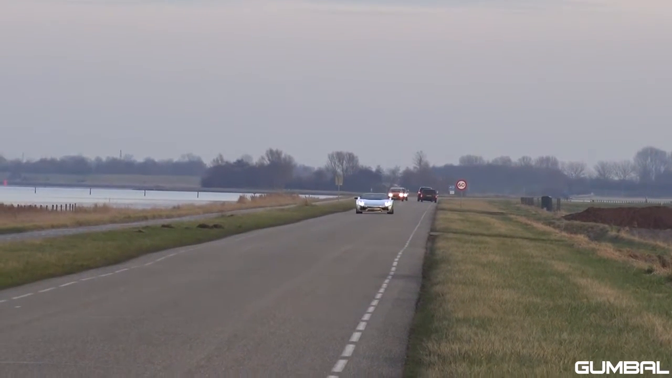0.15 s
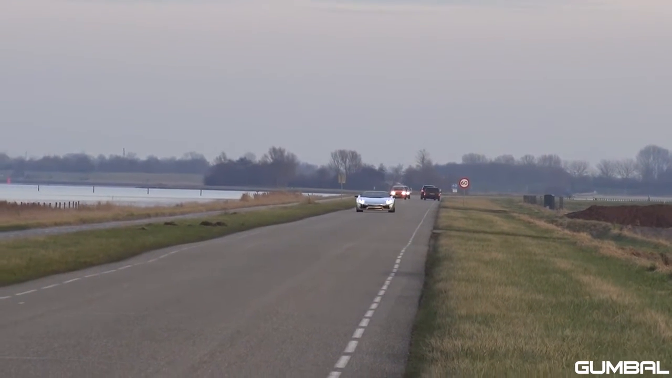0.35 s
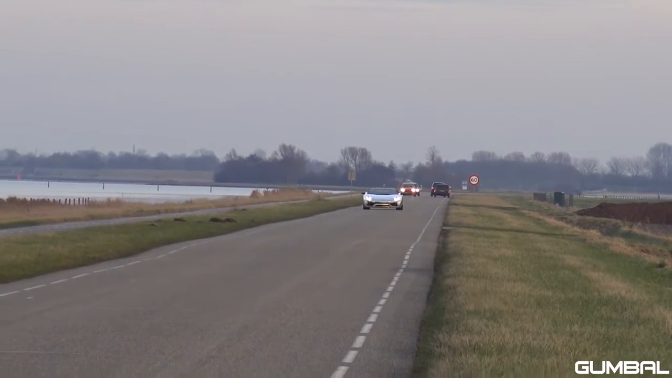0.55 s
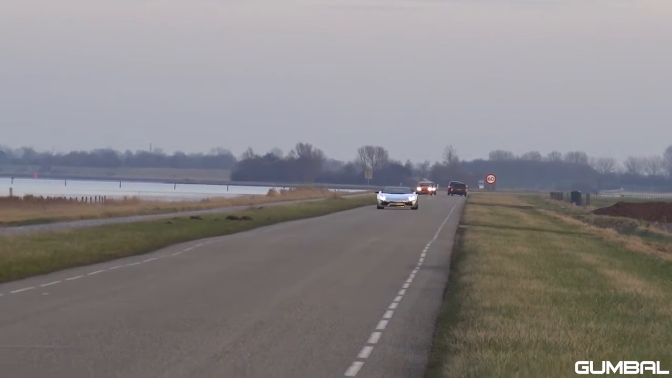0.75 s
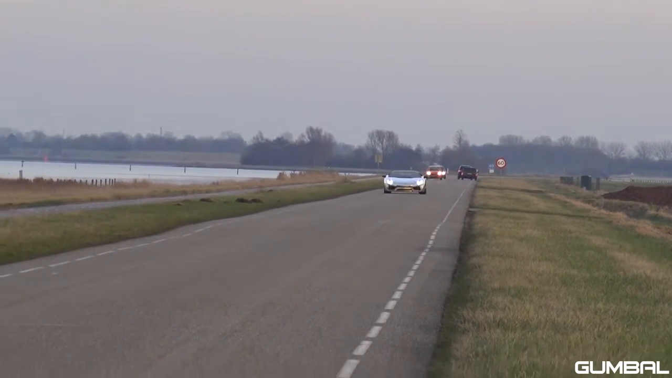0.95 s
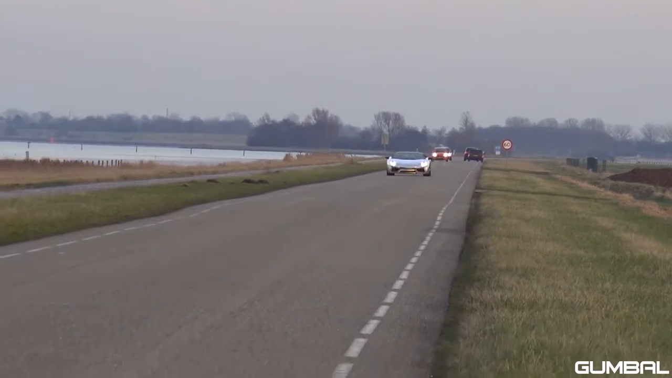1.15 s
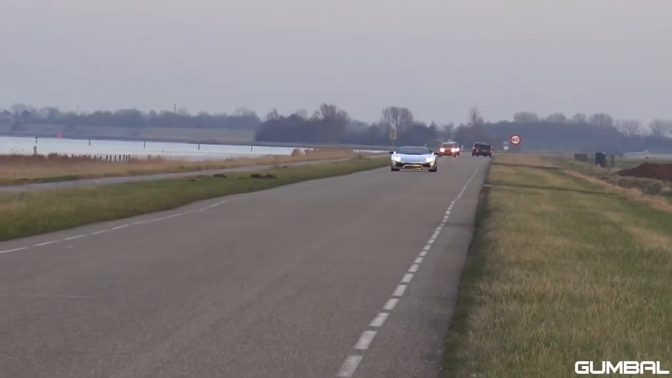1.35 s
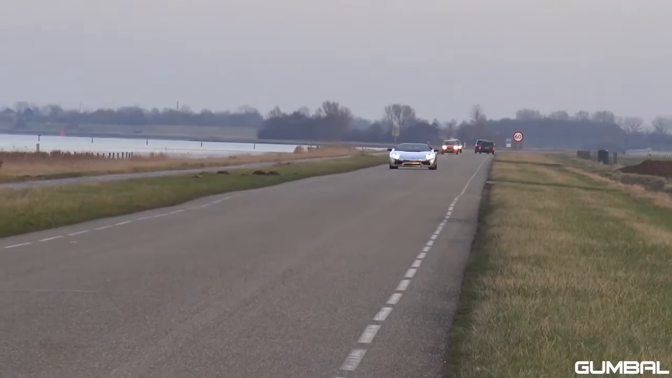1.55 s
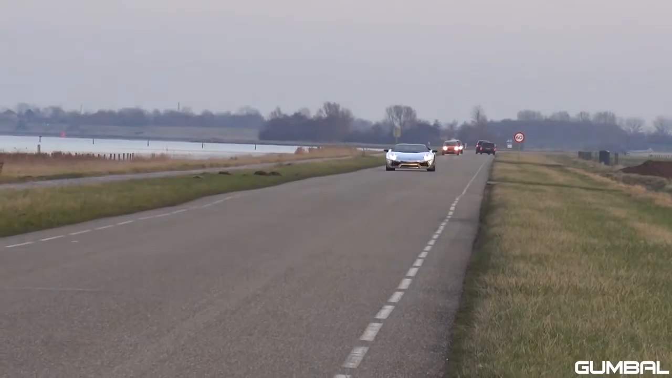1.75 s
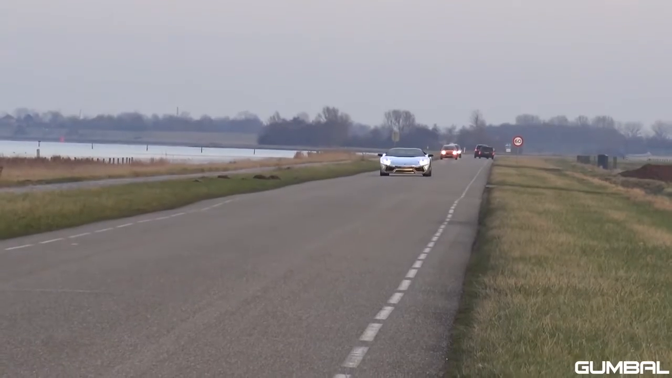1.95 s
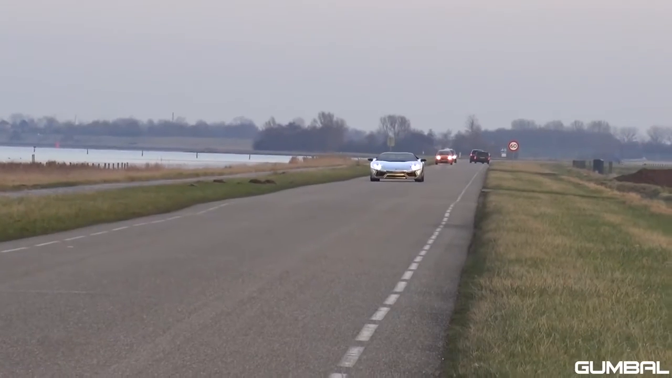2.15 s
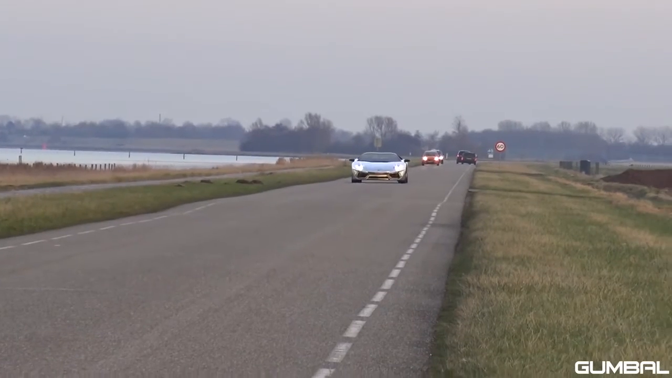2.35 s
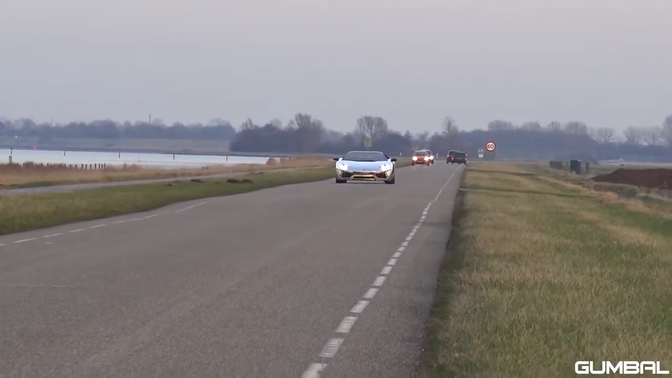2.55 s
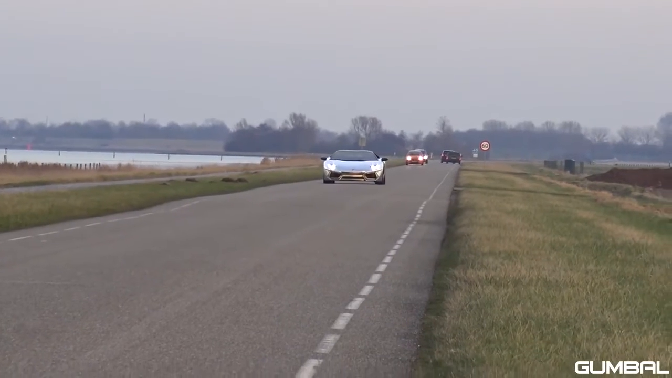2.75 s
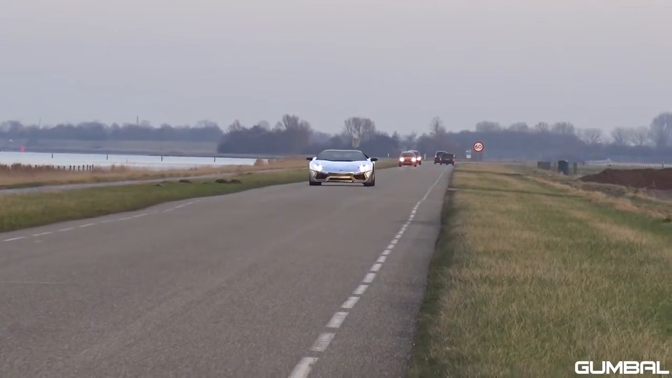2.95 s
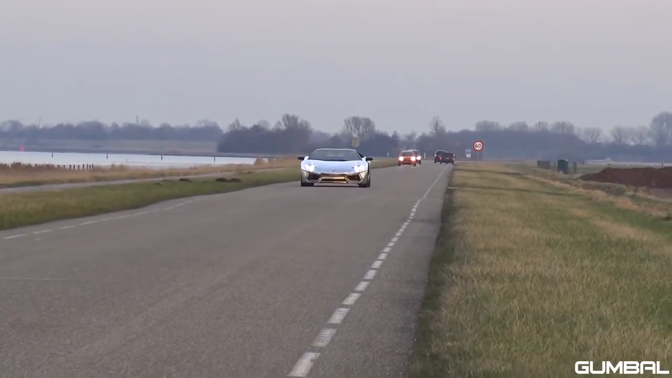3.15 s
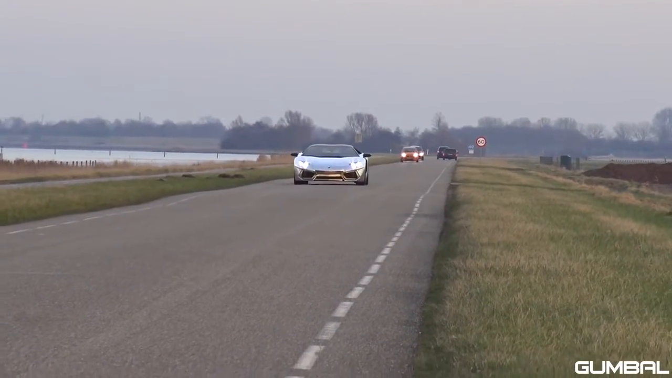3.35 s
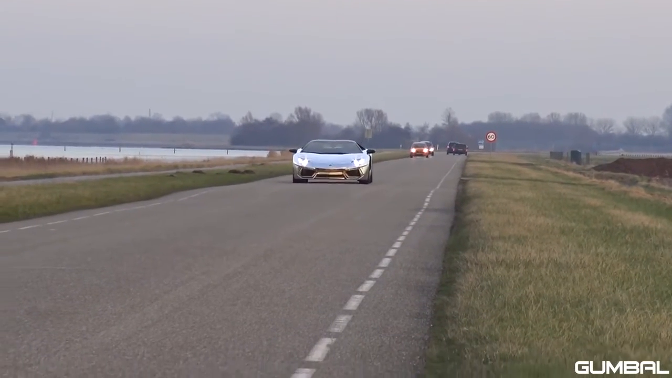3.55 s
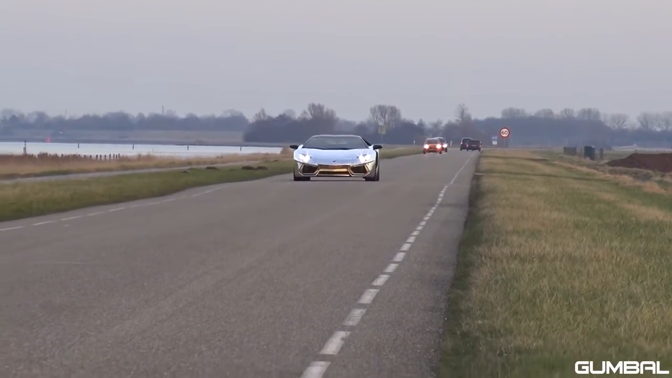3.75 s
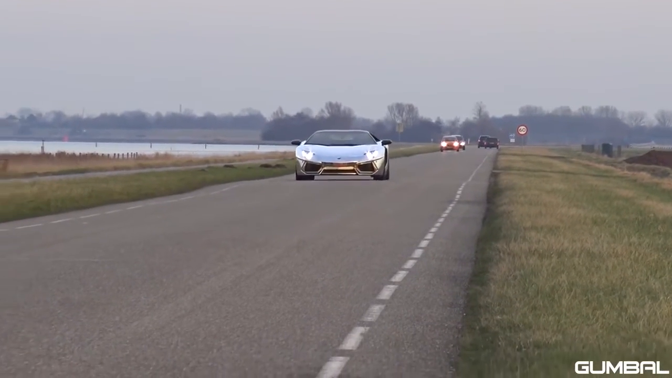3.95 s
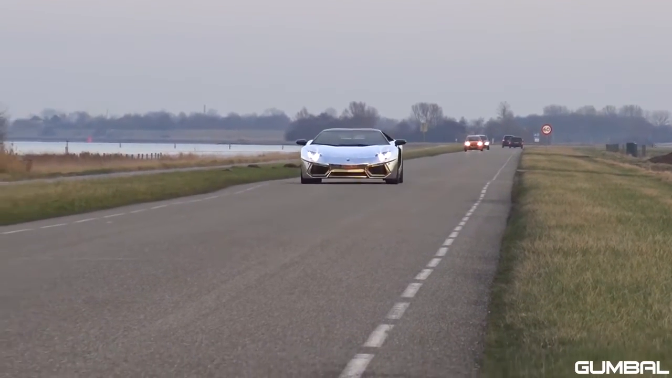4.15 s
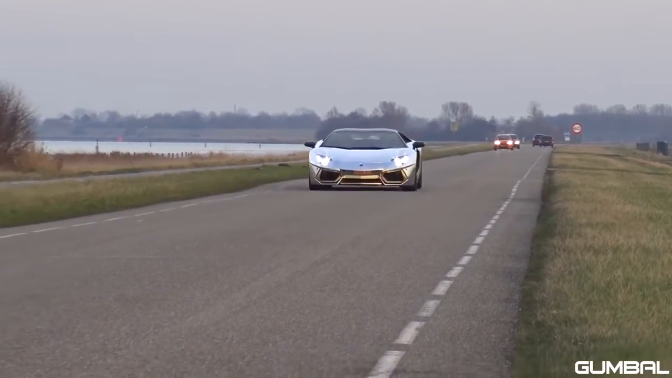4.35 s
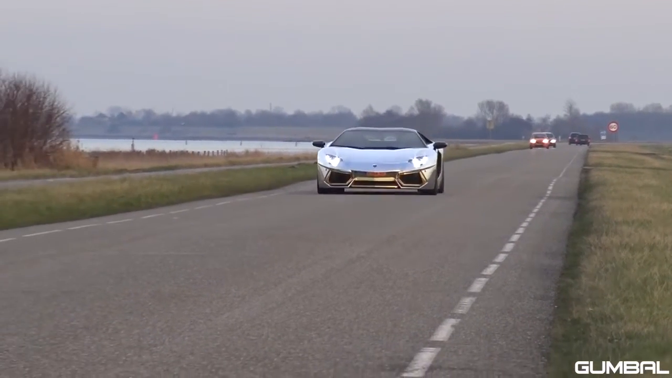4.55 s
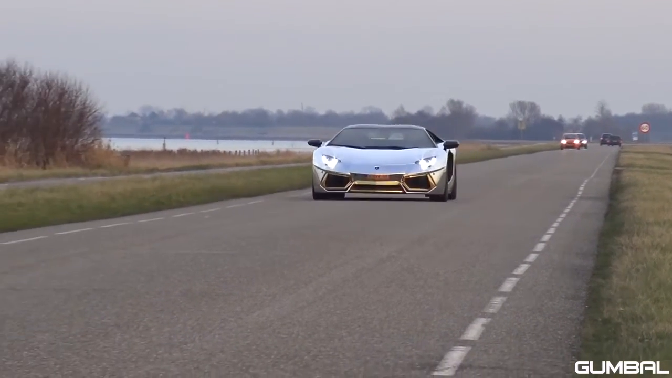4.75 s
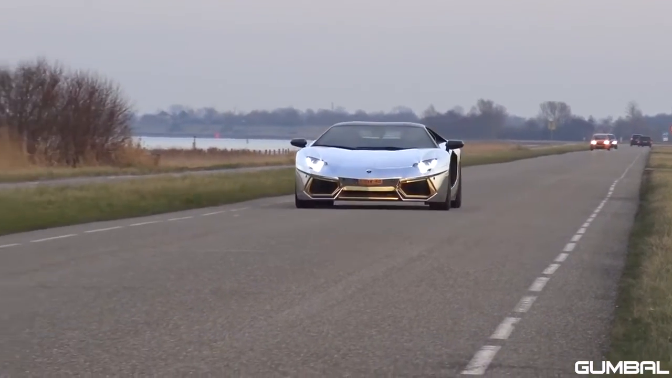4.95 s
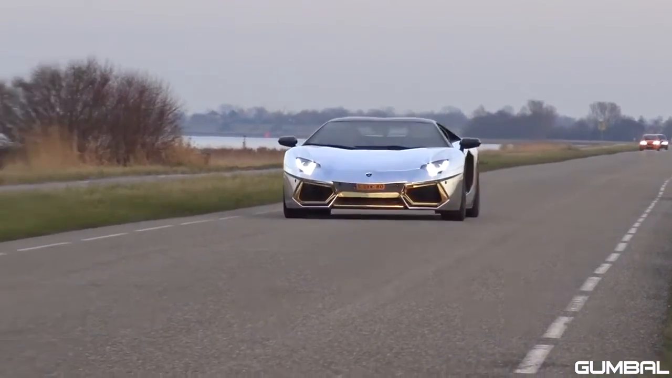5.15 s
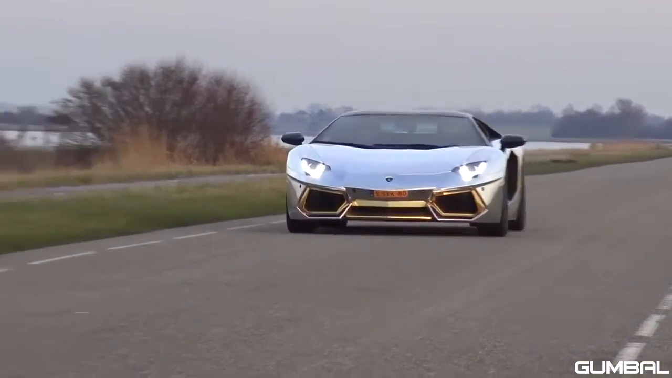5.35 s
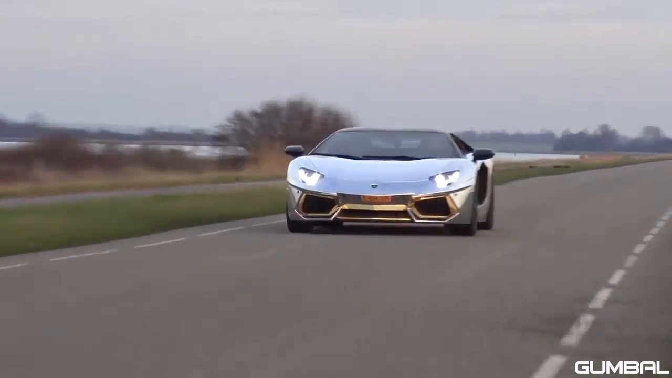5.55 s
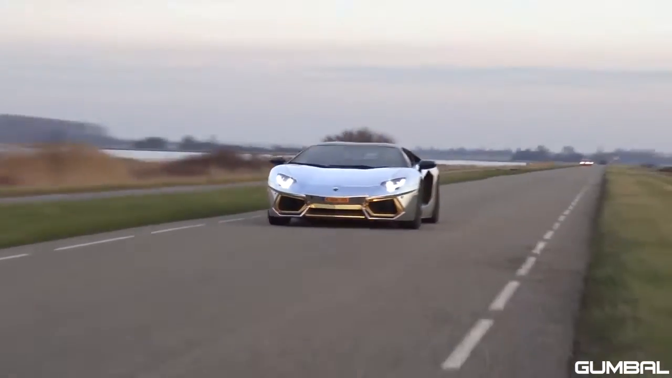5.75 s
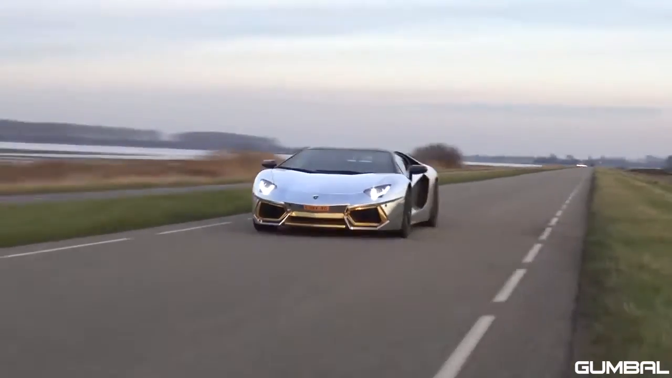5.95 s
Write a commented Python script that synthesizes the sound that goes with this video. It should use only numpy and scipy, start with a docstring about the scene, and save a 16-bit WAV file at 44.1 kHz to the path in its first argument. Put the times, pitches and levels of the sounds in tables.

```python
"""A high engine wail is heard first, harsh for an instant, climbing as a twelve-cylinder sports car nears flat out.
Sines at orders of the four-stroke cycle make the wail; banded noise makes the roar of exhaust flow and tyres,
which brightens as the path shortens. In the one upshift cylinders are cut and low orders and misfires burble;
then a lower note shudders and climbs again until the car draws level. Low noise and short puffs of wind buffet
the microphone over a quiet background of countryside and hiss."""
import sys
import numpy as np
from scipy import signal
from scipy.fft import rfft, irfft, next_fast_len
from scipy.io import wavfile

SR = 44100
rng = np.random.default_rng(int(sys.argv[2]) if len(sys.argv) > 2 else 0)


def pcm_store(signal):
    """Save signal as 16-bit PCM."""
    levels = np.round(np.clip(np.atleast_2d(signal), -1, 1) * 32767)
    wavfile.write(sys.argv[1], SR, levels.astype(np.int16).T)


N = 268569
TIME = np.arange(N) / SR
CYLINDERS = 12  # also the order of the firing note, as each cylinder fires once per cycle

# strong engine orders, 12 being the firing note and 6 one cylinder bank: [order in multiples of the
# four-stroke cycle, relative level/dB, loss off the throttle/dB, gain with distance/dB per 100 m]
STRONG_ORDERS = [(6, -25.5, 2, -2.5), (9, -25.5, 5.5, -0.33), (12, -13.5, 19, 0.5), (15, -21.5, 17, -0.25),
                 (21, -23.5, 13.5, -1.5), (24, -25.5, 7, 1.5)]
# exhaust resonances through which the orders sweep: [f/Hz, relative level/dB]
EXHAUST_RESPONSE = [(340, -19.5), (385, -18), (412, -3), (428, -12.5), (455, 4.5), (478, 5), (520, 2),
                    (600, 1), (625, -0.5), (655, -10), (700, -0.5), (800, 2.5), (950, -2.5), (1025, -7.5),
                    (1090, -17), (1280, -5), (1400, 1.5), (1450, 0), (1510, -4), (1610, -0.5), (1710, -7),
                    (1780, -1.5), (1900, -6.5)]
# slow swell of the firing note: [t/s, relative level/dB]
FIRING_SWELL = [(0, 0.5), (.2, -0.5), (.38, 1), (.55, -2), (.8, 1.5), (1, -1), (1.2, 1.5), (1.6, -2),
                (2.1, -0.6), (2.6, 3.5), (3.25, 1.5), (3.62, 4.5), (4.35, 1.5), (4.55, 3), (5.15, 3.5),
                (5.38, 0), (5.68, 1), (6.09, -3)]
TONES_LEVEL_OFF_M = 24.4  # well inside this the body hides the tailpipes and the tones hardly grow
HARSH_UNTIL_S, HARSH_FADE_S, HARSH_DB = 0.079, 0.046, 5  # orders above the firing note start higher
SHUDDER_DB = 3  # the note is loudest when dragged lowest


def engine_note(cycles, cycle_hz, lifted, waver_db=1.5, note_waver_db=0.38):
    """Harmonic synthesis through a source filter: strong orders, coloured by the exhaust, waver in moving air."""
    out = np.zeros(N)
    hundreds = distance() / 100
    harsh_start = 1 - ramp(HARSH_UNTIL_S, HARSH_FADE_S)
    for order, db, lost_db, carry_db in STRONG_ORDERS:
        throttle_gain = 1 - lifted * (1 - from_db(-lost_db))
        level = db + carry_db * hundreds + 20 * np.log10(throttle_gain)
        level = level + at_hz(EXHAUST_RESPONSE, order * cycle_hz)
        if order == CYLINDERS:
            level = level + in_time(FIRING_SWELL)[0] + SHUDDER_DB * shudder() + note_waver_db * drift(6.9)
            phase = 0
        else:
            level = level + HARSH_DB * harsh_start * (order > CYLINDERS) + waver_db * drift(6.8)
            phase = 2 * np.pi * rng.random() + 0.18 * drift(10)
        out += from_db(level) * np.sin(2 * np.pi * order * cycles + phase)
    return np.sqrt(2) * out / np.hypot(1, distance() / TONES_LEVEL_OFF_M)


# firing rate as heard, before flares, shudder and jitter: [t/s, f/Hz]
FIRING_RATE = [(0, 681), (.1, 683), (.17, 695), (.55, 724), (1.3, 764.5), (1.6, 787), (2.4, 842),
               (3.3, 896.5), (4.1, 936), (4.55, 953), (4.77, 952), (4.92, 868), (5, 768), (5.3, 783),
               (5.6, 804), (5.9, 830), (6.09, 838)]
# brief rev flares over bumps in the road: [t/s, firing rate gained/Hz]
ROAD_BUMPS = [(2.65, 4), (3.63, 5), (3.8, 4), (5.7, 6), (5.91, 5)]
BUMP_S = 0.035  # from the peak of a flare to 1/e of it
SHUDDER_DEPTH_HZ = 20.4  # swing of the firing rate before damping


def engine_cycle_rate():
    """Rotational kinematics: firing rate over cylinder count gives cycles per second, with slight random jitter."""
    flares = sum(gained * np.exp(-((TIME - s) / BUMP_S) ** 2) for s, gained in ROAD_BUMPS)
    firing_hz = in_time(FIRING_RATE)[0] + flares - SHUDDER_DEPTH_HZ * shudder()
    return firing_hz / CYLINDERS * (1 + 0.001 * drift(20))


CLUTCH_S, SHUDDER_PER_S, SHUDDER_DECAY_S = 5.0, 8.57, 0.24  # closing time, swings per second, decay


def shudder():
    """Damped oscillation: the driveline rings down after the clutch closes."""
    age = np.maximum(TIME - CLUTCH_S, 0)
    return np.exp(-age / SHUDDER_DECAY_S) * np.sin(2 * np.pi * SHUDDER_PER_S * age)


LIFT_S, LIFT_TAKES_S, REOPEN_S, REOPEN_TAKES_S = 4.59, 0.058, 4.962, 0.16


def throttle_lift():
    """Exponential relaxation: the throttle snaps shut (towards 1), then reopens linearly (to 0)."""
    shutting = 1 - np.exp(-np.maximum(TIME - LIFT_S, 0) / LIFT_TAKES_S)
    return shutting * (1 - ramp(REOPEN_S, REOPEN_TAKES_S))


# faint orders with a height of their own: [order in multiples of the four-stroke cycle]
FAINT_ORDERS = (2, 3, 7, 8, 18, 20, 27, 30, 33, 36, 39, 42, 45, 48, 51, 54, 57, 60, 63, 72)
# their heights, before clarity and fading: [level above the roar in one Hz/dB]
FAINT_HEIGHTS = [14.6, 19.7, 13, 13, 20.7, 18.6, 18, 18.3, 21.9, 20, 22, 9.7, 20, 11, 12, 18, 22, 18, 22,
                 17]
CLARITY_DB_PER_100_M = 3  # the faint orders stand out more from far away


def engine_overtones(cycles, cycle_hz, travel, fading_db=2.5, weakest_db=7):
    """Broken symmetry: unequal cylinders add faint orders that travel like the roar and fade over the ground."""
    out = np.zeros(N)
    clarity = CLARITY_DB_PER_100_M * travel[1]
    heights = {order: weakest_db for order in range(4, 36) if order % 3}
    heights.update(zip(FAINT_ORDERS, FAINT_HEIGHTS))
    for order, db in heights.items():
        level = roar_db(order * cycle_hz, travel) + db + clarity + fading_db * drift(3)
        phase = 2 * np.pi * (order * cycles + rng.random()) + 0.18 * drift(10)
        out += from_db(level) * np.sin(phase)
    return out


# orders heard in the burble: [order in multiples of the four-stroke cycle]
BURBLE_ORDERS = (1, 2, 3, 4, 5, 7, 8, 10, 11, 13, 19)
# their levels before the burst gains: [level in the cut/dB, level as the gear bites/dB]
BURBLE_LEVELS = [(-37.5, -43.5), (-35, -29.5), (-36.5, -35), (-40, -34), (-34, -36), (-42.5, -25),
                 (-41.5, -28), (-30, -39.5), (-31.5, -35.5), (-43.5, -34.5), (-36.5, -41.5)]
# exhaust pipe resonances: [f/Hz, width/Hz, relative level/dB]
PIPE_RESONANCES = [(75, 51, -6), (135, 24, 6.5), (238, 89, -1), (460, 57, 11), (780, 220, -0.5),
                   (1530, 520, -6)]
# bursts of ignition cut in the shift: [start t/s, end t/s, gain level/dB]
IGNITION_CUTS = [(4.595, 4.76, -4.5), (4.76, 4.815, 2), (4.85, 4.935, -3.5)]
# growl as the next gear bites: [start t/s, end t/s, gain level/dB]
GEAR_BITES = [(4.935, 5.085, -3.5)]
BURST_EDGE_S, MISFIRE_DB = 0.053, -36  # misfire level before the burst gains


def gear_change(cycles, misfire_share=0.22, rough_db=5.0, muffler_hz=2000):
    """Subharmonics and impulse response: patterned cuts add low orders, stray misfires ring the exhaust pipe."""
    cut, bite = bursts(IGNITION_CUTS), bursts(GEAR_BITES)
    burble = np.zeros(N)
    for order, (cut_db, bite_db) in zip(BURBLE_ORDERS, BURBLE_LEVELS):
        size = cut * from_db(cut_db) + bite * from_db(bite_db)
        size = size * from_db(rough_db * drift(18))
        phase = 2 * np.pi * (order * cycles + rng.random()) + 0.15 * drift(14)
        burble += np.sqrt(2) * size * np.sin(phase)
    fires = np.diff(np.floor(cycles * CYLINDERS), prepend=0) > 0
    misfires = fires * (rng.random(N) < misfire_share) + 1e-18
    rung = np.zeros(N)
    for k, (hz, width_hz, db) in enumerate(PIPE_RESONANCES):
        rung += (-1) ** k * from_db(db) * resonate(misfires, hz, width_hz)
    muffled = signal.sosfilt(signal.butter(4, muffler_hz, fs=SR, output="sos"), rung)
    return burble + from_db(MISFIRE_DB) * (cut + bite) * rms_one(muffled)


def bursts(rows):
    """Gating: gain over time of a set of bursts with short linear edges."""
    half = BURST_EDGE_S / 2
    gain = np.zeros(N)
    for start, end, db in rows:
        gain += from_db(db) * (ramp(start - half, BURST_EDGE_S) - ramp(end - half, BURST_EDGE_S))
    return gain


def roar(cycles, travel, patchy_db=1.5, throb=0.14, scatter_hz=7000):
    """Turbulent broadband noise, amplitude-modulated by the engine; its treble arrives scattered."""
    out = np.zeros((2, N))
    edges = np.r_[np.geomspace(70, 1400, 14)[:-1], np.geomspace(1400, 7000, 17), 8500, 11000, 13500, 16500]
    for hz, (direct, scattered) in noise_bands(edges):
        spread = 0.12 + 0.58 * hz / (hz + scatter_hz)
        gain = from_db(roar_db(hz, travel) + patchy_db * drift(10))
        # scattered sound has opposite sign in the two channels
        out += gain * (direct + spread * scattered * [[1], [-1]]) / np.hypot(1, spread)
    beats = np.sin(2 * np.pi * CYLINDERS / 4 * cycles) + np.sin(2 * np.pi * CYLINDERS * cycles)
    return out * (1 + throb * beats)


# exhaust flow and tyres close by, before path losses: [f/Hz, level/dB per Hz]
ROAR_SPECTRUM = [(70, -60.5), (130, -55), (300, -56), (450, -51.5), (620, -53.5), (900, -48.5), (1400, -51),
                 (2200, -57), (3000, -67), (4000, -64.5), (4700, -62), (6200, -76), (7200, -87.5),
                 (9000, -89), (13000, -90.5), (15500, -102)]
# thinning of the roar along the way: [f/Hz, level lost/dB per doubling of distance]
DISTANCE_THINNING = [(150, 4.5), (270, 4.5), (700, 2.42), (1100, 2.26), (1700, 2.65), (3000, 1.5),
                     (4000, 5.5), (5500, 9), (7500, 14.5)]
GRASS_DB_PER_100_M = 8.5  # lost at all pitches alike
SHADE_DB, NOTCH_DB, NOTCH_OCTAVES = 6.5, 5.5, 0.32  # shade is for 100 m beyond the near distance


def roar_db(hz, travel):
    """Spreading, absorption and ground interference: level per Hz of the roar at one frequency, over time."""
    doublings, hundreds, edge_hz, shaded = travel
    off = np.log2(hz / edge_hz) / NOTCH_OCTAVES
    notch = NOTCH_DB * (1 - off ** 2) * np.exp(-off ** 2 / 2)  # beside the notch the two paths add up
    shade = SHADE_DB * hundreds ** 2 * shaded * (1 + np.tanh(off)) / 2
    spreading = at_hz(DISTANCE_THINNING, hz) * doublings
    return at_hz(ROAR_SPECTRUM, hz) - spreading - GRASS_DB_PER_100_M * hundreds - shade - notch


NEAR_M = 20  # path losses are counted from here
# the ground shades the treble above an edge that rises as the car nears
EDGE_HZ_AT_100_M, EDGE_POWER, EDGE_BOTTOM_HZ, EDGE_TOP_HZ = 3770, 1.384, 1850, 4380
CARRY_SHARE, CARRY_UNTIL_S, CARRY_FADE_S = 0.96, 0.45, 0.28  # at first the treble carries through the shade


def journey():
    """Outdoor propagation: distance doublings, hundreds of metres past near, shade edge/Hz and shade depth."""
    hundreds = distance() / 100
    edge_hz = np.clip(EDGE_HZ_AT_100_M / hundreds ** EDGE_POWER, EDGE_BOTTOM_HZ, EDGE_TOP_HZ)
    shaded = 1 - CARRY_SHARE * (1 - ramp(CARRY_UNTIL_S, CARRY_FADE_S))
    return np.log2(distance() / NEAR_M), hundreds - NEAR_M / 100, edge_hz, shaded


# when it draws level, its speed there, its acceleration all the way and its sideways distance
PASS_S, PASS_M_PER_S, GAIN_M_PER_S2, SIDE_M = 6.024, 43.55, 4.67, 15


def distance():
    """Uniform acceleration: metres from the car to the listener."""
    to_go = PASS_S - TIME
    along = PASS_M_PER_S * to_go - GAIN_M_PER_S2 * to_go ** 2 / 2
    return np.hypot(along, SIDE_M)


# the two microphone ports as the car sees them: [f/Hz, left lead/rad, left minus right level/dB]
PORT_DIFFERENCES = [(101, 0.5, 3), (393, 0.01, 1), (760, 0.12, 3.5), (1300, 0.32, -0.5), (2440, 0.84, 4),
                    (3780, 0.72, 0), (5700, 4.5, 1.5), (7850, -3, 0.5), (14000, 7.5, 4.5)]


def ports(x):
    """Interaural-style phase and level differences: half to each side, placing the car slightly left."""
    margin = SR // 20
    x = np.pad(x, ((0, 0), (margin, margin)), "reflect", reflect_type="odd")
    size = next_fast_len(x.shape[1])
    hz = np.maximum(np.fft.rfftfreq(size, 1 / SR), 1)
    lead = np.exp(0.5j * at_hz(PORT_DIFFERENCES, hz))
    half = lead * from_db(at_hz(PORT_DIFFERENCES, hz, axis=2) / 2)
    return irfft(rfft(x, size) * np.array([half, 1 / half]), size)[:, margin:margin + N]


# wind rumble before lumps, lull and port gains: [f/Hz, level/dB per Hz]
WIND_SPECTRUM = [(20, -49), (40, -59.5), (70, -67.5), (120, -78.5), (250, -89), (600, -105)]
# puffs that bump the microphone: [peak t/s, level before trim and port gains/dB, Gaussian spread t/s]
WIND_PUFFS = [(0.01, -26.5, 0.027), (0.668, -32, 0.027), (0.754, -33, 0.065), (1.38, -33, 0.013),
              (1.5, -39, 0.022), (1.585, -39, .015), (1.682, -23.5, 0.013), (1.754, -44, .012),
              (1.947, -26.5, 0.023), (2.236, -24, 0.013), (2.7, -27.5, .012), (3.219, -39, 0.012),
              (4.197, -43, 0.028), (4.82, -30, .025)]
LULL_S, LULL_DB_PER_S = 5.6, 15.5  # the rumble dies down as the car arrives


def wind(lumpy_db=3.0, puff_db=-11, puff_hz=55, puff_width_hz=60):
    """Turbulent pressure fluctuation: lumpy low rumble and single puffs, unrelated at the two ports."""
    edges = np.geomspace(16, 500, 9)
    rumble = sum(from_db(at_hz(WIND_SPECTRUM, hz)) * noise for hz, noise in noise_bands(edges))
    rumble = rumble * from_db(lumpy_db * drift(20) - LULL_DB_PER_S * np.maximum(TIME - LULL_S, 0))
    bumps = np.zeros(N)
    for s, db, puff_s in WIND_PUFFS:
        bumps += from_db(db + puff_db) * np.exp(-((TIME - s) / puff_s) ** 2 / 2)
    eddies = resonate(rng.standard_normal((2, N)), puff_hz, puff_width_hz)
    eddies = resonate(eddies, puff_hz, puff_width_hz)
    return (rumble + bumps * rms_one(eddies)) * from_db([[1.5], [-1.8]])


# quiet countryside and microphone hiss, before port gains: [f/Hz, level/dB per Hz]
FLOOR_SPECTRUM = [(100, -87.5), (500, -82.5), (2000, -93), (4000, -102.5), (6000, -100), (9000, -101),
                  (15000, -102)]


def background():
    """Stationary noise floor: still countryside and the microphone's own hiss."""
    edges = np.geomspace(80, 18000, 9)
    floor = sum(from_db(at_hz(FLOOR_SPECTRUM, hz)) * noise for hz, noise in noise_bands(edges))
    return floor * from_db([[0.5], [-0.8]])


def noise_bands(edges):
    """Spectral shaping: (centre Hz, noise pair of unit power per Hz), unrelated between neighbouring bands."""
    white = rng.standard_normal((2, 2, N)) * np.sqrt(SR / 2)
    for k, (low, high) in enumerate(zip(edges, edges[1:])):
        band = signal.butter(2, [low, high], "band", fs=SR, output="sos")
        yield np.sqrt(low * high), signal.sosfilt(band, white[k % 2])


def resonate(x, hz, width_hz):
    """Second-order resonance: a pole pair with a gain of about 1 at the peak."""
    r = np.exp(-np.pi * width_hz / SR)
    zeros = np.array([1, 0, -1]) * (1 - r * r) / 2
    return signal.lfilter(zeros, [1, -2 * r * np.cos(2 * np.pi * hz / SR), r * r], x)


def drift(rate):
    """Low-passed random process: slow chance of unit spread, faster for a higher rate in Hz."""
    step = 40  # samples between drawn values
    r = np.exp(-2 * np.pi * rate * step / SR)
    settling = 2000
    chance = rng.standard_normal(N // step + settling + 2)
    slow = signal.lfilter([1], [1, -2 * r, r * r], chance)[settling:]
    return np.interp(np.arange(N) / step, np.arange(len(slow)), rms_one(slow))


def ramp(start_s, length_s):
    """Linear envelope: rises from 0 to 1."""
    return np.clip((TIME - start_s) / length_s, 0, 1)


def in_time(rows):
    """Linear interpolation: each value column of a curve table at every sample."""
    s, *columns = np.transpose(rows)
    return [np.interp(TIME, s, c) for c in columns]


def at_hz(points, hz, axis=1):
    """Logarithmic pitch scale: read a spectrum table on a log-frequency axis."""
    points = np.array(points)
    return np.interp(np.log(hz), np.log(points[:, 0]), points[:, axis])


def from_db(db):
    """Decibel definition: level to amplitude gain."""
    return 10 ** (np.asarray(db) / 20)


def rms_one(x):
    """Mean-square normalisation: scale to unit power."""
    return x / np.sqrt(np.mean(x ** 2) + 1e-20)


OFF_THROTTLE_ROAR_DB = 1.86  # the exhaust flow slackens with the throttle lifted


def scene():
    """Superposition: engine cycles, throttle and distance shape the car; wind and background are added."""
    cycle_hz = engine_cycle_rate()
    cycles = np.cumsum(cycle_hz) / SR
    travel = journey()
    lifted = throttle_lift()
    tones = engine_note(cycles, cycle_hz, lifted) + engine_overtones(cycles, cycle_hz, travel)
    flow = from_db(-OFF_THROTTLE_ROAR_DB * lifted) * roar(cycles, travel)
    car = tones + gear_change(cycles) + flow
    return ports(car) + wind() + background()


CUTOFF_HZ = 15700


def record(dry):
    """Soft saturation and band limiting: high peaks are rounded, ends eased and the top cut steeply."""
    rounded = dry / (1 + (dry / 1.05) ** 8) ** (1 / 8)
    to_nearest_end = np.minimum(TIME, TIME[::-1])
    ends = np.sin(np.pi / 2 * np.minimum(to_nearest_end / 0.002, 1)) ** 2
    steep_cut = signal.ellip(12, 0.1, 110, CUTOFF_HZ, fs=SR, output="sos")
    return signal.sosfilt(steep_cut, rounded * ends)


dry = scene()
out = record(dry)
pcm_store(out)
```